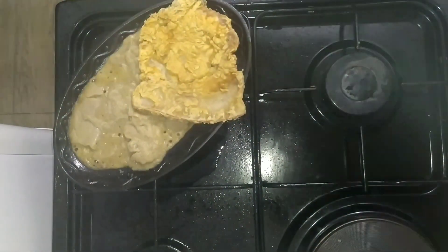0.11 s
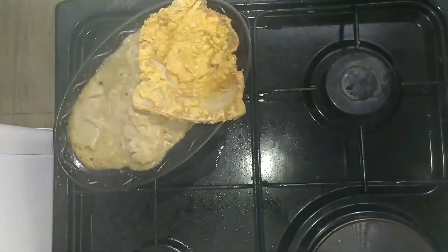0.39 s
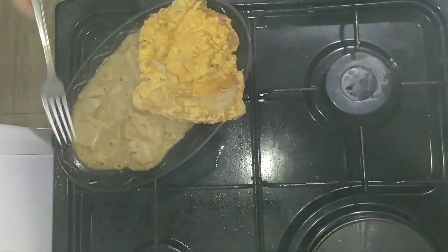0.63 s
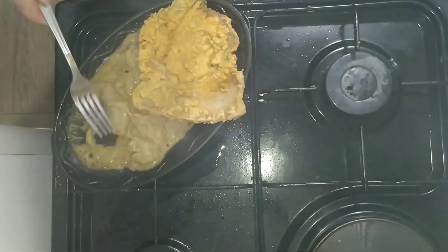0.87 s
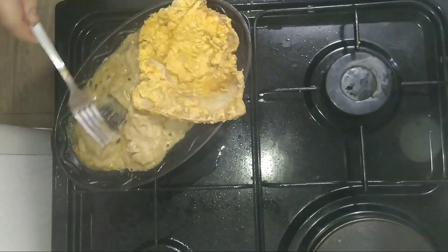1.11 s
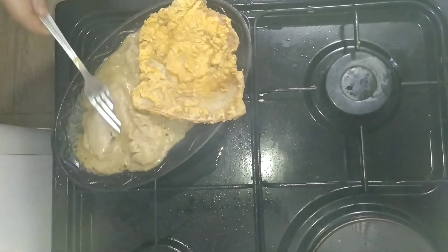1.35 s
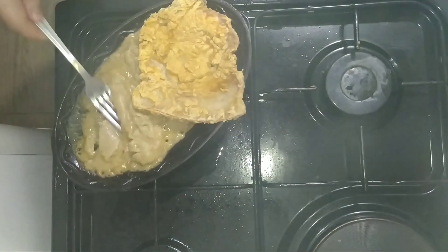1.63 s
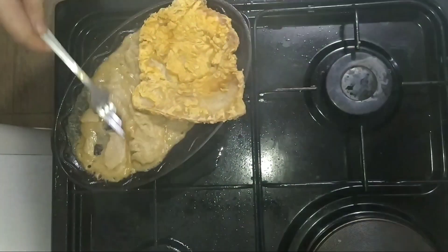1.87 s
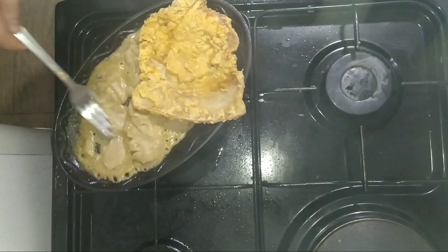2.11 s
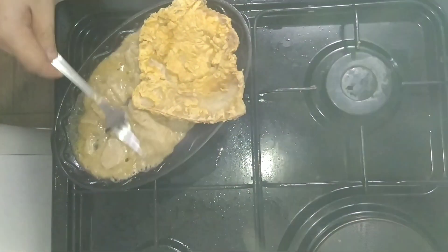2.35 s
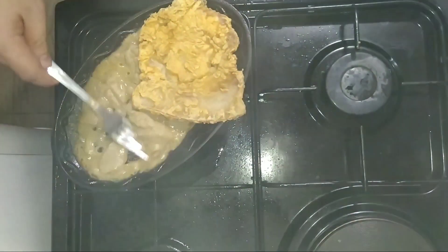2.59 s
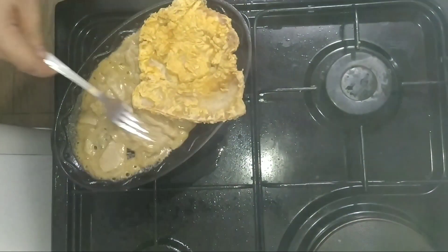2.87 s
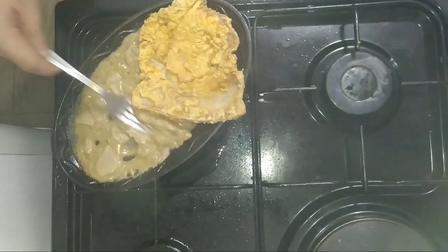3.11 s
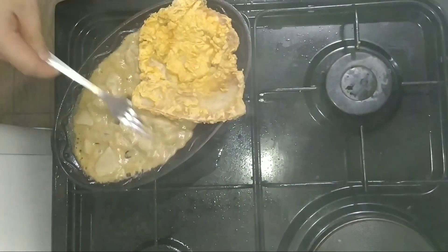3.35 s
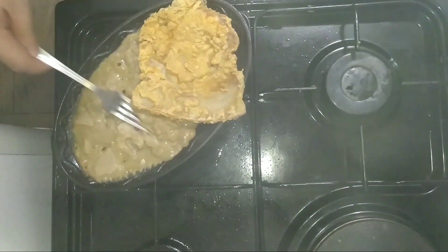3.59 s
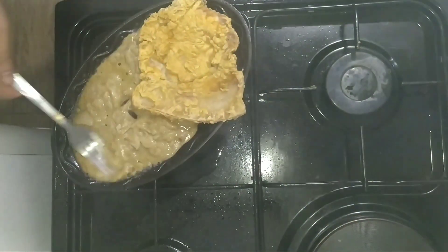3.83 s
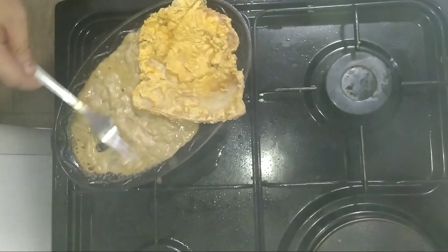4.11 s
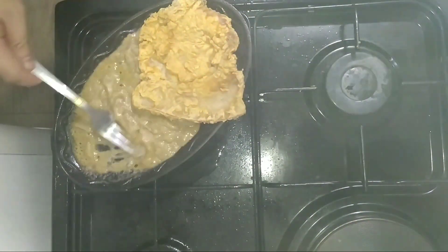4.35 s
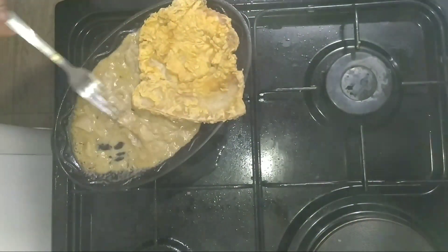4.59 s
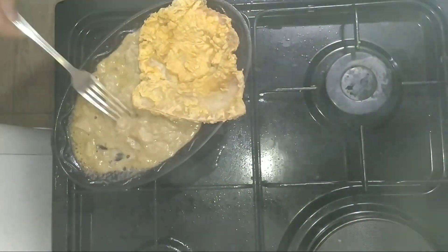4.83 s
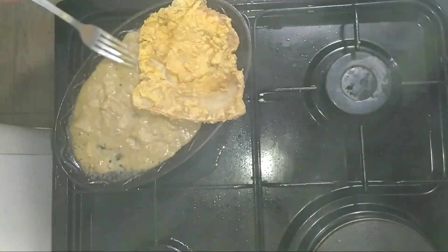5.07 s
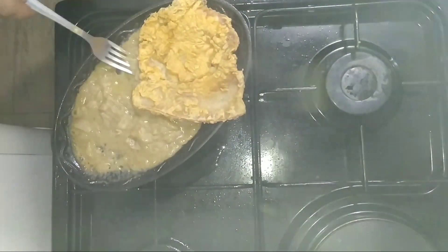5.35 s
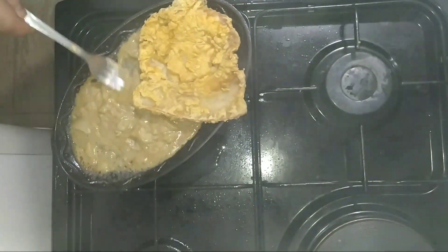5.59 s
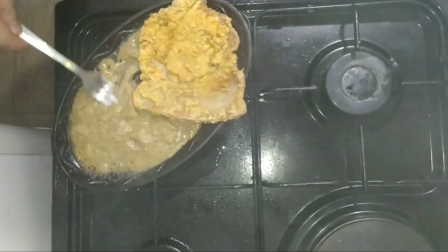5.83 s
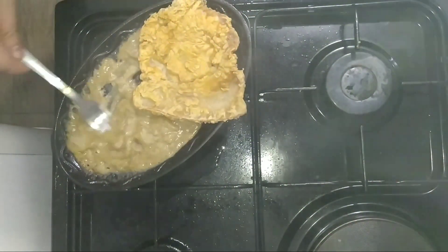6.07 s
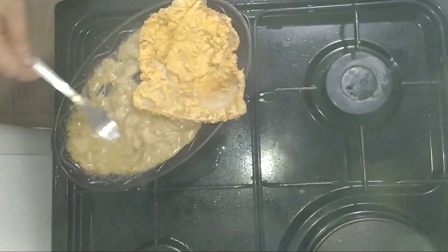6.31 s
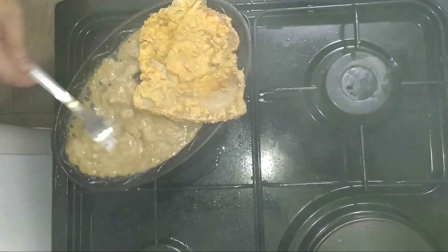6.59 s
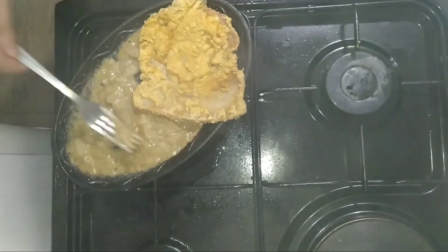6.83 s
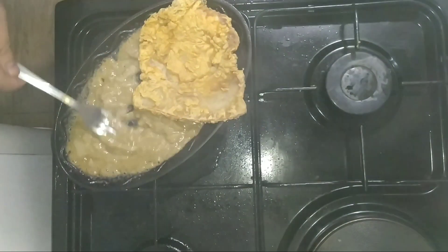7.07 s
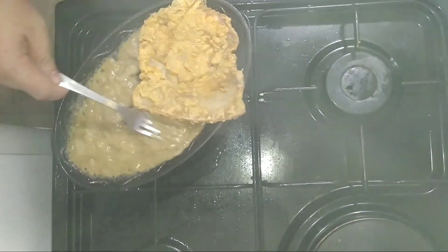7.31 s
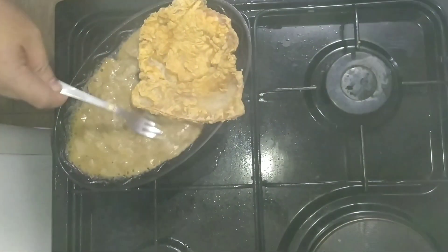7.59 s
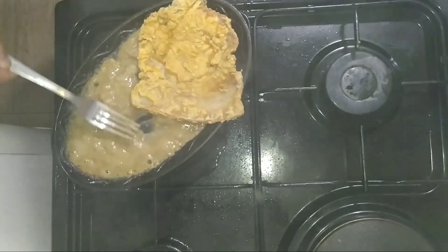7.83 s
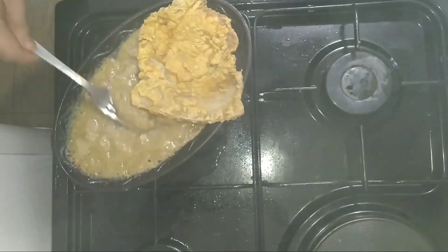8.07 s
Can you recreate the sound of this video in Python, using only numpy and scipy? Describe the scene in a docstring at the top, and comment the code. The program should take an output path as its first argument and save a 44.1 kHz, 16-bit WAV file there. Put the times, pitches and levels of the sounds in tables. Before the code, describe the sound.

Close, continuous bright sizzling of boiling gravy, peppered with sharp fat snaps and low bubble plops, over a very quiet kitchen rumble.

```python
"""On a kitchen stove top, gravy boils on a hot iron plate while a fork stirs it, heard in stereo.
The sizzle is four layers of noise, from fine hiss to deep bubbling, lifted by puffs of steam.
Small bubbles snap as short dying rings; thicker ones plop with a rising tone; the fork knocks dully.
Behind them the kitchen rumbles as shaped noise and far engines drone as single wavering tones."""
import sys
import numpy as np
from scipy import signal
from scipy.fft import rfft, irfft, next_fast_len
from scipy.io import wavfile
from scipy.ndimage import uniform_filter1d, map_coordinates

SR = 44100
rng = np.random.default_rng(int(sys.argv[2]) if len(sys.argv) > 2 else 0)


def to_wav(s):
    """Save 16-bit WAV."""
    ch = np.atleast_2d(s).T  # columns
    pcm = np.round(np.clip(ch, -1, 1) * 32767)  # PCM
    wavfile.write(sys.argv[1], SR, pcm.astype(np.int16))


def to_linear_factor(level_db):
    """Convert decibel levels (scalar or array-like) to linear amplitude factors."""
    exponent = np.asarray(level_db, float) / 20
    return 10 ** exponent


N = 361179  # length in samples

# The fork moves the boiling across the plate. Each row: time in seconds, left over right in dB.
SIDE_DRIFT = [(0.0, 1.0), (1.23, 0.2), (3.33, -0.2), (4.6, 0.7), (5.7, 0.6), (6.61, 0.5), (7.73, 1),
              (8.19, 0.9)]
# Far engines, one list each. Each row: time in seconds, pitch in Hz, level in dB, both before wavering.
ENGINE_TONES = [
    [(0, 61.6, -69), (.3, 63.4, -48), (.6, 63.6, -72)],
    [(1.7, 34, -74), (2.4, 41.3, -64), (2.9, 48.8, -55), (3.3, 51, -72), (3.7, 54.35, -61),
     (4.15, 59.2, -53), (4.4, 60.3, -62), (4.7, 62.4, -53), (5.1, 62.9, -52), (5.35, 64.3, -58),
     (5.6, 65, -73)],
    [(2.2, 81, -63), (2.4, 80.8, -56), (2.8, 82, -69), (3.4, 81, -59), (4.2, 81.2, -63), (4.5, 82.4, -70)],
    [(6.8, 89, -68), (7.5, 81.5, -57), (8.19, 80, -61)],
    [(6.1, 66, -74), (6.5, 66, -56), (6.9, 64.6, -72), (7.5, 65, -51), (7.65, 65, -57), (7.8, 65, -50),
     (8.19, 65.8, -68)],
    [(4.9, 118, -72), (5.3, 119.4, -61), (6.0, 119, -66), (6.6, 119.6, -72)],
    [(3.4, 149, -72), (3.8, 152, -66), (4.3, 145, -63), (4.6, 145, -74)],
    [(3.45, 176, -74), (3.65, 174, -61), (3.95, 168, -74)],
    [(7.85, 202, -74), (8.07, 201, -58), (8.19, 202, -68)],
]
# Tone colours of the four boiling layers; the hiss ends steeply near 15.5 kHz.
# Each row: frequency in Hz, relative strength in dB.
HISS_COLOUR = [(5500, -30), (6800, -6), (8000, 0), (9500, 0), (11300, -.3), (12800, -3.5), (14500, -5.5),
               (15200, -8), (15480, -9.5), (15560, -60)]
SPATTER_COLOUR = [(3500, -26.5), (4500, -3.5), (5500, -0.5), (6500, -1.5), (7200, -7), (8500, -16)]
SEETHE_COLOUR = [(1200, -26), (1750, -9.5), (2000, -0.5), (3000, -0.35), (4000, 2.1), (4600, 0),
                 (5800, -14.5)]
BUBBLE_COLOUR = [(300, -13.5), (480, -6.5), (600, -1.5), (800, -3), (970, -8), (1105, -5), (1300, -1),
                 (1650, 2), (2200, -21), (4000, -41)]
# Tone colour of the kitchen noise. Each row: frequency in Hz, relative strength in dB.
ROOM_COLOUR = [(26, -60), (38, -5), (50, 2), (100, -2), (200, -4.5), (240, -13), (265, 1), (295, 1.5),
               (313, -8), (335, 2.5), (352, -21), (380, -20), (410, -7), (600, -15.5), (1200, -23.5)]
# Resonances of plate and stove top. Each row: frequency in Hz, width in Hz, strength over the colour in dB.
PLATE_MODES = [(583.5, 17, 2.5), (674, 19, -11), (725, 23, 2.5), (765, 28, 1), (852, 23, 2), (930, 16, 1),
               (1050, 57, 1), (1178, 86, 0.5), (1303, 28, 6), (1436, 98, 2), (1534, 22, -5),
               (1766, 27, 7.5), (1850, 24, 2), (1936, 27, 3), (2430, 920, -5.5)]
# Standing waves of the kitchen. Each row: frequency in Hz, width in Hz, relative strength in dB.
STANDING_WAVES = [(65, 8.7, 6), (129, 13, -11), (145, 12, 2.5), (171.3, 7, -1.5)]
# The two microphone ports. Each row: frequency in Hz, likeness from 0 to 1,
# lag of the left in radians, left over right in dB.
MIC_PORTS = [(60, .8, 0, .2), (170, .92, .1, 0), (370, .75, .1, -.4), (650, .88, .4, .6),
             (900, .55, .4, -.5), (1400, .85, 1.0, -.7), (1650, .4, 2.0, -.3), (1950, .55, .9, 0),
             (2600, .2, .2, -.5), (3500, .38, .7, -.2), (3800, .1, 1.8, 0), (4100, .55, 3.1, 0),
             (4350, .1, 3.6, 0), (4550, .1, 3.6, 0), (4750, .55, 3.2, 0), (5000, .3, 3.3, 0),
             (6000, .28, 3.9, 0), (8000, .15, 5.6, .2), (9500, .12, 9.3, 0), (11200, .3, 12.2, 0),
             (13000, .32, 15.5, .3), (15500, .3, 15.7, .7)]
# Large bubbles plopping. Each row: start in seconds, strength before the fade in dB, starting pitch in Hz.
PLOP_EVENTS = [(1.732, -28, 296), (2.636, -27, 560), (3.226, -27, 720), (4.42, -27, 726), (4.654, -25, 600),
               (4.671, -24, 660), (5.043, -17.5, 890), (5.25, -24, 760), (5.467, -28, 690),
               (5.758, -24, 584), (6.28, -25, 750), (6.633, -22.5, 710), (6.909, -24, 744),
               (7.681, -24, 567), (7.959, -23, 705)]
# The fork touching the iron under the gravy. Each row: start in seconds, level before the fade in dB.
FORK_KNOCKS = [(3.527, -54), (4.669, -44), (5.044, -43), (5.322, -42), (7.552, -55)]
# Tone colour of a knock. Each row: frequency in Hz, relative strength in dB.
KNOCK_COLOUR = [(60, -30), (120, -2), (280, 2), (450, -4), (900, -2), (1400, 4), (2500, -15), (5000, -40)]
# The sharpest spits of fat. Each row: start in seconds, peak in dB before the stereo balance,
# pitch in Hz, left over right in dB before the drift.
FAT_SPITS = [(0.2921, -13, 10380, 1), (0.835, -10, 9500, -1), (1.27, -13, 8180, 3),
             (1.4663, -12, 11540, -2), (1.69, -11, 7670, -1), (1.999, -13, 8140, 4), (2.2201, -11, 7840, 4),
             (2.2532, -11, 9910, 0), (2.3601, -8, 9800, -2), (3.2464, -8, 11100, 1),
             (3.7794, -16, 10100, -2), (4.291, -10, 9700, -5), (5.247, -16, 8260, -2),
             (6.6175, -12, 9170, -2), (6.7814, -12, 11630, -1), (6.8699, -15, 10340, 2),
             (7.554, -11, 8870, 4), (8.013, -10, 11330, 4)]
# Heat reaching the gravy as the fork bares or covers the iron, before each layer takes its share.
# Each row: time in seconds, fine steam up or down in dB, thick boiling up or down in dB.
HEAT = [(0, -1.5, 0.5), (.5, -0.5, 1), (.95, -0.5, 1), (1.4, 0, 0.5), (1.7, 0.7, -1.5), (2.1, 0, -1.5),
        (2.4, 1.1, 1.5), (2.7, 1, -0.8), (2.9, 0, 2), (3.2, 0, -1), (3.5, 1, -0.3), (3.8, 0.5, 2),
        (4.1, -0.5, 0.5), (4.5, -0.5, -2), (4.9, -0.6, 0), (5.4, -0.6, 0.4), (5.8, -0.5, 2),
        (6.3, -0.9, 0.5), (6.7, 0.5, 1.5), (7.1, 0, -0.5), (7.45, -1.4, -5.5), (7.7, -0.8, 1),
        (8.19, -1.5, -2.5)]
# Four sizes of bubble, finest first. Each row: base level in dB, share of the heat, share of each puff,
# change over time in dB per second, own unsteadiness in dB.
HISS_LEVEL = (-26.5, 0.97, 0.64, -0.05, 0.16)
SPATTER_LEVEL = (-34.5, 0.55, 0.88, -0.32, 0.5)
SEETHE_LEVEL = (-36, 0.5, 0.3, 0.03, .5)
BUBBLE_LEVEL = (-47, 0.25, 0.14, -0.23, 0.2)
# Puffs of steam breaking through the crust, before each layer takes its share.
# Each row: middle in seconds, rise in dB, length in seconds.
STEAM_PUFFS = [(0.042, 3, 0.053), (0.234, 3.5, 0.31), (0.462, 3, .05), (0.702, 2, 0.12), (.84, 0.5, 0.036),
               (1.194, 1, 0.16), (1.653, 1.5, .07), (1.88, 3, 0.063), (1.993, 3, 0.046),
               (2.378, 2.5, 0.046), (2.604, 1.5, 0.068), (2.963, 3, 0.047), (3.069, 4, 0.072),
               (3.347, 2, 0.12), (3.54, 2, 0.055), (3.782, 1.5, 0.077), (4.698, 2, 0.11), (5.053, 3, 0.079),
               (5.24, 2.5, 0.055), (5.783, 2.5, 0.098), (6.1, 1.5, 0.12), (6.47, 1.5, .06), (6.627, 3, .05),
               (6.96, 2.5, 0.07), (7.324, 4.5, 0.13), (7.625, 4, 0.2), (7.938, 3.5, 0.057)]
# The highest treble of the hiss; only its ups and downs about the mean count.
# Each row: time in seconds, relative level in dB.
TOP_TREBLE = [(0, -5), (.15, -7), (.93, -6.5), (2.57, -6.5), (3.15, -2), (3.4, -3.5), (4.17, -4.5),
              (6.5, -5), (7.3, -4), (7.6, -3), (8.19, -4)]
# Narrow, brief holes and strands heard mostly in the treble. Each row: frequency in Hz, depth in dB.
STRAND_DEPTH = [(1500, 1), (2500, 3.5), (4000, 6), (6500, 6), (8000, 3), (11500, 3), (12400, 6.5),
                (15500, 6.5)]


def unit(x):
    """Scales a sound to an rms (average strength) of 1."""
    return x / np.sqrt(np.mean(x ** 2) + 1e-20)


def along(points, hz):
    """Reads every column after the frequency, on a log frequency axis."""
    f, *columns = np.transpose(points)
    return [np.interp(np.log(hz + 1), np.log(f + 1), column) for column in columns]


def curves(rows):
    """Gives one value per sample for each column after the time."""
    s, *columns = np.transpose(rows)
    return [np.interp(np.arange(N) / SR, s, column) for column in columns]


def wobble(rate):
    """A smooth random curve through `rate` random points a second."""
    points = rng.standard_normal(int(N * rate / SR) + 4)
    return map_coordinates(points, [np.arange(N) * rate / SR])


def filtered(x, response):
    """Multiplies the spectrum of x by a response, given as a function of frequency."""
    m = next_fast_len(N + 8192)
    return irfft(rfft(x, m) * response(np.fft.rfftfreq(m, 1 / SR)), m)[..., :N]


def ringing(modes, hz):
    """Summed response of resonances, each strongest at its own frequency."""
    return sum(to_linear_factor(db) * 1j * hz * width / (centre ** 2 - hz ** 2 + 1j * hz * width)
               for centre, width, db in modes)


def add(out, s, sound):
    """Mixes a short sound in at a time in seconds."""
    part = out[round(s * SR):][:len(sound)]
    part += sound[:len(part)]


def engines():
    """Only the lowest, wavering tone of each far engine comes through the walls."""
    out, t = np.zeros(N), np.arange(N) / SR
    for rows in ENGINE_TONES:
        hz, db = curves(rows)
        passing = (t >= rows[0][0]) & (t <= rows[-1][0])
        turns = np.cumsum(hz + 0.94 * wobble(8)) / SR
        out += passing * to_linear_factor(db + 1.8 * wobble(5.7)) * np.sin(2 * np.pi * turns)
    return out


def kitchen():
    """Room noise, plus the room's standing waves, which swell and fade one by one."""
    air = filtered(rng.standard_normal((2, N)), lambda hz: to_linear_factor(along(ROOM_COLOUR, hz)[0]))
    rumble = np.zeros((2, N))
    for mode in STANDING_WAVES:
        wave = filtered(rng.standard_normal((2, N)), lambda hz: ringing([mode], hz))
        rumble += to_linear_factor(1.1 * wobble(2.53)) * wave
    return to_linear_factor(-57.5 + 1.1 * wobble(4)) * unit(air) + to_linear_factor(-61.0) * unit(rumble)


def fork():
    """Each touch is a dull, ragged knock of noise with a softer tail that dies more slowly."""
    knock_t60_s, tail_t60_s, tail_db = .03, .15, -5  # t60: time to fall by 60 dB
    out, t = np.zeros(N), np.arange(SR // 6) / SR
    rattle = unit(filtered(rng.standard_normal(N), lambda hz: to_linear_factor(along(KNOCK_COLOUR, hz)[0])))
    fade = to_linear_factor(-60 * t / knock_t60_s) + to_linear_factor(tail_db - 60 * t / tail_t60_s)
    shape = (1 - np.exp(-t / 0.0014)) * fade
    for s, db in FORK_KNOCKS:
        add(out, s, to_linear_factor(db) * shape)
    return out * rattle


def plops(count=60):
    """Large bubbles ring for some cycles, the pitch rising a little; many weaker ones fall at random."""
    t60_s, rise_s = 0.022, 0.0033
    out, t = np.zeros(N), np.arange(SR // 20) / SR
    u = rng.random((count, 3))
    scatter = np.transpose([u[:, 0] * N / SR, -38 + 7 * u[:, 1], 380 * 2.92 ** u[:, 2]])
    shape = to_linear_factor(-60 * t / t60_s) * (1 - np.exp(-t / rise_s)) ** 2
    for s, db, hz in [*PLOP_EVENTS, *scatter]:
        add(out, s, to_linear_factor(db) * shape * np.sin(2 * np.pi * hz * t * (1 + 4.0 * t)))
    return out


def snaps(s, db, hz, left_db, cycles):
    """Short dying rings, one per bubble, each reaching the two ports at its own lag."""
    k = np.arange(96)  # samples in a ring
    turns = hz[:, None] * k / SR
    ring = np.exp(-turns / cycles) * (1 - np.exp(-turns)) * np.sin(2 * np.pi * turns)
    ring /= np.abs(ring).max(axis=1, keepdims=True)
    lag = np.round(rng.normal(4, 5, len(s)))  # samples, mostly the left later
    start = np.round(s * SR)
    out = []
    for at, side in ((start + lag, 1), (start, -1)):
        where = np.clip(at[:, None] + k, 0, N - 1).astype(int)
        sound = to_linear_factor(db + side * left_db / 2)[:, None] * ring
        out.append(np.bincount(where.ravel(), sound.ravel(), N))
    return np.array(out)


def crackle(count=5000):
    """The sharpest spits of fat ring over a random scatter of smaller bubbles of many pitches."""
    u, g = rng.random((count, 2)), rng.standard_normal((count, 2))
    hz = np.clip(7500 * np.exp(0.41 * g[:, 0]), 1800, 14500)
    # small, high bubbles burst hardest
    size_db = -35 - 2.8 * np.log(u[:, 1] + .004) + 6 * np.log2(hz / 8000)
    scatter = snaps(u[:, 0] * N / SR, size_db, hz, 1.2 * g[:, 1], cycles=3.4)
    return scatter + snaps(*np.transpose(FAT_SPITS), cycles=2.5)


def puffs():
    """Each puff of steam is a short bell-shaped rise in level, in dB."""
    t = np.arange(N) / SR
    return sum(db * np.exp(-(2 * (t - s) / length) ** 2) for s, db, length in STEAM_PUFFS)


def level(heat_db, puff_db, base_db, heat_share, puff_share, db_per_s, unsteady_db):
    """A layer follows the heat and the puffs, drifts steadily over time and wavers on its own."""
    t = (np.arange(N) - N / 2) / SR
    return base_db + heat_share * heat_db + puff_share * puff_db + db_per_s * t + unsteady_db * wobble(17)


def bursts(colour, spread_db, patchy_db, wide):
    """Two unrelated showers of tiny bursts of uneven size, patchy over pitch and time, rms 1."""
    sizes = np.minimum(rng.exponential(size=(2, N)), 6)
    z = signal.stft(rng.standard_normal((2, N)) * to_linear_factor(spread_db * sizes), nperseg=256)[2]
    # one random map of loud and soft patches serves both showers
    field = uniform_filter1d(rng.standard_normal(z.shape[1:]), max(round(wide), 1), axis=0)
    field = uniform_filter1d(field, size=7, axis=1) - uniform_filter1d(field, size=40, axis=1)
    shower = signal.istft(z * to_linear_factor(patchy_db * unit(field)), nperseg=256)[1][:, :N]

    def response(hz):
        """Every burst shakes the plate, whose resonances add to the noise."""
        return to_linear_factor(along(colour, hz)[0]) * (1 + ringing(PLATE_MODES, hz))
    return unit(filtered(shower, response))


def fine_hiss():
    """The finest layer of noise; its highest treble is heard to rise and fall apart from the rest."""
    bright_hz = 12500  # where the highest treble begins
    top_db, = curves(TOP_TREBLE)
    hiss = bursts(HISS_COLOUR, spread_db=2.5, patchy_db=0.46, wide=12)
    top = filtered(hiss, lambda hz: 1 / (1 + (bright_hz / (hz + 1)) ** 12))
    swing_db = top_db - top_db.mean() + 0.4 * wobble(7.3) + 0.8 * wobble(70)
    return hiss + top * (to_linear_factor(swing_db) - 1)


def sizzle():
    """Four sizes of bubble boil together; spurts of steam lift them all."""
    spurt = wobble(30) + 0.56 * wobble(60)
    # brief spurts on a slower flutter
    spurt = spurt - uniform_filter1d(spurt, size=SR // 18) + 0.23 * wobble(22)
    # bursts start sharply and die away with a time constant of 3 ms
    kicks = rng.exponential(size=N) ** 4 - 24
    grain = unit(signal.lfilter([1], [1, -np.exp(-1 / (.003 * SR))], kicks))
    steam_db, boil_db = curves(HEAT)
    puff_db = puffs()

    hiss_db = level(steam_db, puff_db, *HISS_LEVEL) + 0.78 * spurt + 0.57 * grain
    spatter_db = level(steam_db, puff_db, *SPATTER_LEVEL) + 0.63 * spurt + 0.33 * grain
    seethe_db = level(boil_db, puff_db, *SEETHE_LEVEL) + 0.62 * spurt
    bubble_db = level(boil_db, puff_db, *BUBBLE_LEVEL) + 0.23 * spurt
    return (to_linear_factor(hiss_db) * fine_hiss()
            + to_linear_factor(spatter_db) * bursts(SPATTER_COLOUR, spread_db=2.5, patchy_db=-0.2, wide=7)
            + to_linear_factor(seethe_db) * bursts(SEETHE_COLOUR, spread_db=2.5, patchy_db=0.95, wide=5)
            + to_linear_factor(bubble_db) * bursts(BUBBLE_COLOUR, spread_db=3.5, patchy_db=1.3, wide=3))


def stranded(pair):
    """Leaves narrow, brief holes and strands in a sound, deepest in parts of the treble."""
    hz, _, z = signal.stft(pair, SR, nperseg=1024)
    field = uniform_filter1d(rng.standard_normal(z.shape), size=4, axis=2)
    field = uniform_filter1d(field, size=2, axis=1)
    depth_db = along(STRAND_DEPTH, hz)[0][:, None]
    gain = to_linear_factor(depth_db * np.minimum(unit(field), .8))
    gain = gain / np.sqrt(np.mean(gain ** 2, axis=2, keepdims=True))  # keeps the tone colour
    return signal.istft(z * gain, SR, nperseg=1024)[1][:, :N]


def ports(pair):
    """A spread-out sound reaches the two ports partly alike, the left a little later."""
    def response(hz):
        """Shares of the common and the differing sound for each port."""
        alike, lag, left_db = along(MIC_PORTS, hz)
        turn = np.arccos(np.clip(alike, 0, 1)) / 2
        skew = to_linear_factor(left_db / 2) * np.exp(-.5j * lag)
        left = [np.cos(turn) * skew, np.sin(turn) * skew]
        right = [np.cos(turn) / skew, -np.sin(turn) / skew]
        return np.array([left, right])
    return filtered(pair[None], response).sum(axis=1)


def scene():
    """Adds up the plate, the fork, the kitchen and the far engines at the microphone."""
    background = ports(kitchen() + engines() * [[1], [.12]])  # engines: mostly common sound
    left_db, = curves(SIDE_DRIFT)
    plate = (stranded(ports(sizzle())) + crackle()) * to_linear_factor([left_db / 2, -left_db / 2])
    return plate + plops() + fork() + background


def top_cut(x):
    """Nothing passes above the cut-off."""
    return signal.sosfilt(signal.butter(12, 15520, fs=SR, output="sos"), x)


def record(dry):
    """The microphone weakens the deepest bass, below about 36 Hz."""
    mic_low_hz = 36
    heard = filtered(dry, lambda hz: 1 / np.sqrt(1 + (mic_low_hz / (hz + 1)) ** 6))
    return top_cut(heard)


dry = scene()
out = record(dry)
to_wav(out)
```